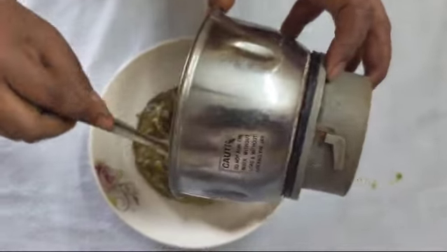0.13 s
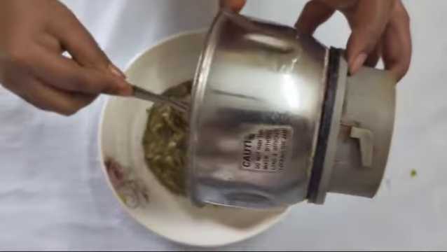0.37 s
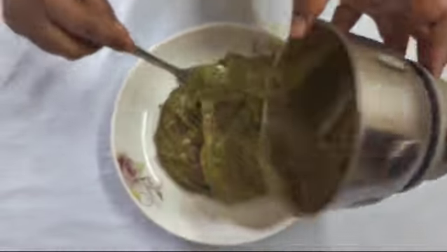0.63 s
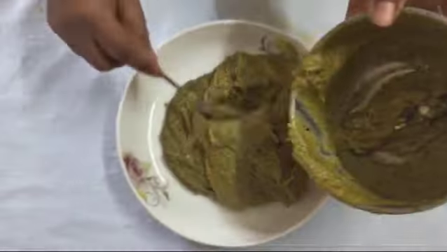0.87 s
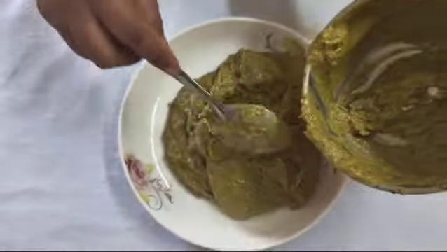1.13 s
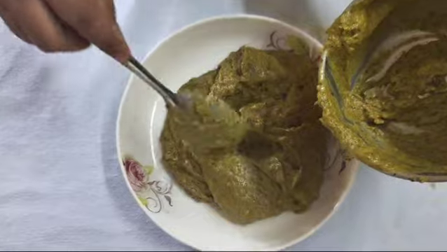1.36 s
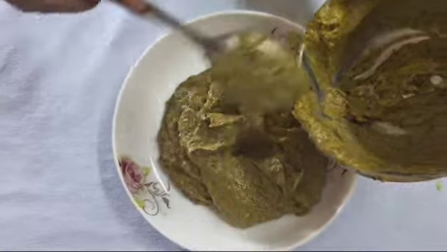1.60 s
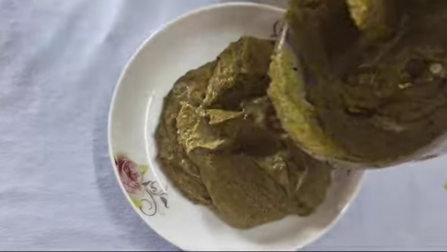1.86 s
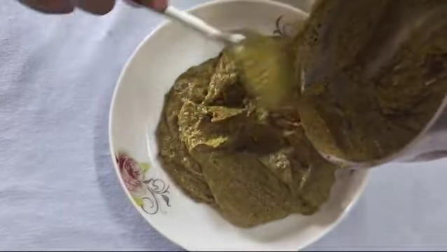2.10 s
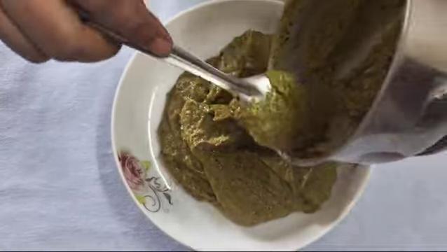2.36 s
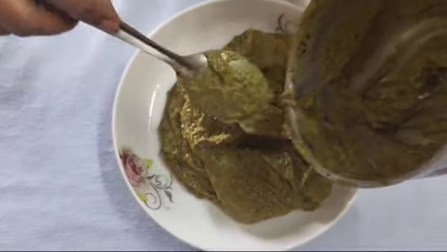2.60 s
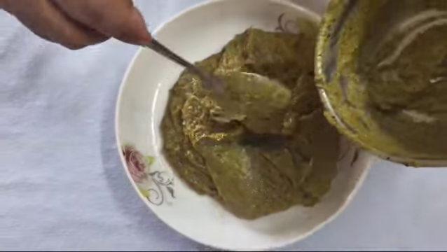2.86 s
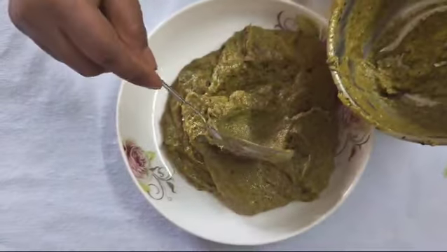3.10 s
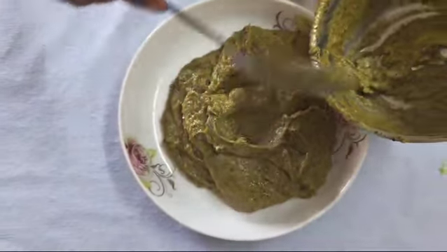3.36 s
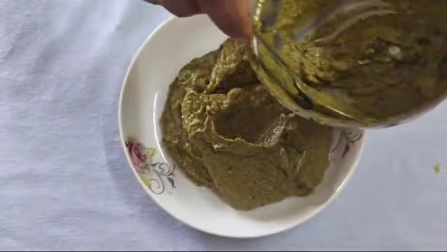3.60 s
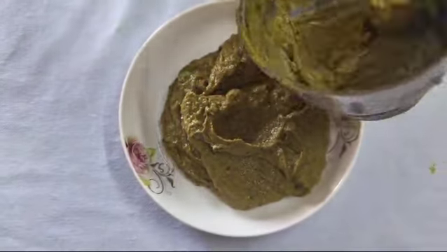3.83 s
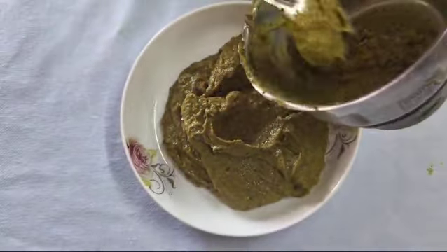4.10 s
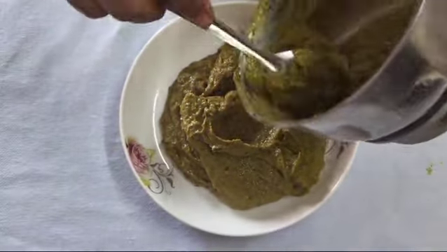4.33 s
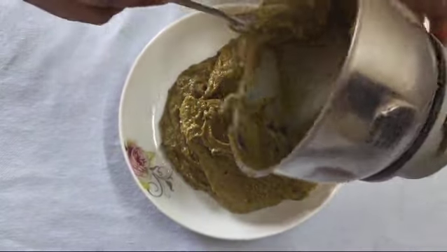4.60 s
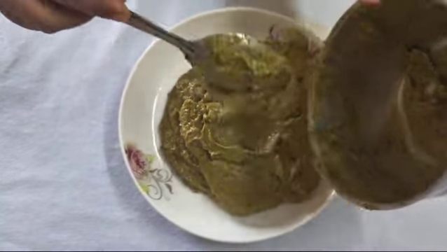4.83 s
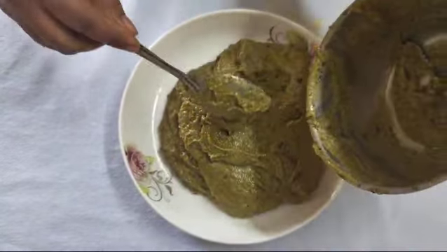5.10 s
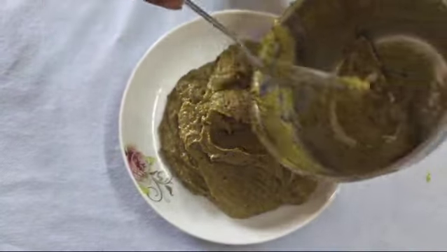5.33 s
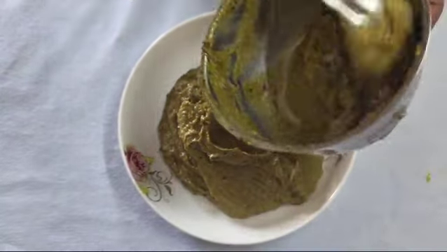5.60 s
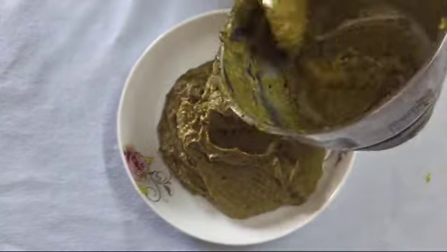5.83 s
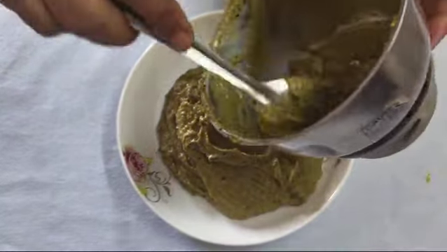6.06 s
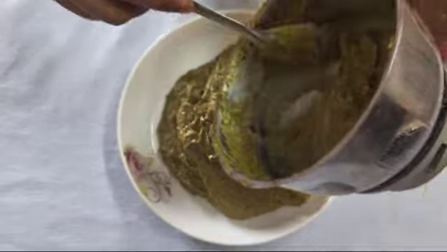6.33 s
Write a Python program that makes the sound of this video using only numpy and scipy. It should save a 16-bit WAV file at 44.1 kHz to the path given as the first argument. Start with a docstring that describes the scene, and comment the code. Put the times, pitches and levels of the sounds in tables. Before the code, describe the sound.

A steel spoon scrapes thick paste from a small metal jar, heard very close in stereo in a quiet kitchen. Rubbing and knocks open it, then only faint taps; a brief scrape and a dense rattle follow midway. A longer, harder run of scraping and clanking comes later, then a pause and a final burst up to the end. Low rumble and faint hiss lie beneath.

```python
"""A steel spoon scrapes thick paste out of a small steel jar, close above two microphones in a quiet kitchen.
It rubs and knocks at once, thins to faint taps, scrapes again near 2 s and rattles densely near 2.6 s;
a long hard run follows from 3.7 to 4.8 s, then faint taps and a last run from 5.6 s to the end.
Strokes are stick-slip noise, knocks short chatter, through resonances of a jar that paste damps to brief rings.
Filtered noise and sines lie under it all: household rumble, deep hand sway, faint hiss, thin appliance whine."""
import sys
import numpy as np
from scipy import signal
from scipy.fft import rfft, irfft, next_fast_len
from scipy.io import wavfile
from scipy.ndimage import uniform_filter1d, map_coordinates

SR = 44100
rng = np.random.default_rng(int(sys.argv[2]) if len(sys.argv) > 2 else 0)


def inscribe(sig):
    """Save sig as 16-bit PCM at rate SR to the path in sys.argv[1].

    A 1-D sig is mono; a 2-D sig holds one channel per row.
    Samples are clipped to [-1, 1] before scaling.
    """
    pcm = np.round(np.clip(np.atleast_2d(sig).T, -1, 1) * 32767)
    wavfile.write(sys.argv[1], SR, pcm.astype(np.int16))


def field_ratio(decibels):
    """Amplitude ratio for a level in dB (20 dB per decade); scalars and array-likes work."""
    return 10 ** (np.asarray(decibels, dtype=float) / 20)


N = 284445
T = np.arange(N) / SR

# Rubbing strokes, a list of rows for each. Each row: time in seconds, pressure in dB,
# belly level relative to it in dB, brightness in dB per octave, wall ring in Hz.
STROKE_ROWS = [
    [(0.0, -43.5, -8, -1, 2500), (0.118, -69, 7.5, 3.5, 2210), (0.16, -80, -13, 0, 2220)],
    [(0.3, -66, -11, 14, 2280), (0.35, -73, -15, 3, 2260), (0.46, -54, 4, 1.5, 2276)],
    [(0.46, -48, -24, 1.5, 2130), (0.51, -63, -9, -6, 2140), (0.572, -58, -9, 5, 1971),
     (0.664, -80, -9, 6, 2000), (0.72, -78, -12, -1, 2085)],
    [(1.98, -83, -9, -14, 2351), (2.075, -55.5, -13, 7, 2215)],
    [(2.075, -74.5, -9, -1, 2250), (2.143, -61.5, -11, 2, 2195), (2.217, -66.5, -10.5, 3.5, 2192),
     (2.26, -102, -14.5, 1, 2010)],
    [(2.52, -76, -11, 0, 2223), (2.564, -70.5, -6.5, 3.5, 2250), (2.586, -70, -8.5, 4, 1980),
     (2.682, -61.5, -13, 1.5, 2351), (2.72, -63.5, -11, 0, 2360)],
    [(3.74, -78, 4.5, -6.5, 2298), (3.792, -62.5, -13, 12, 2670), (3.87, -47, -10.5, 0.5, 2274)],
    [(3.87, -60.5, -16.5, 1.5, 2300), (3.922, -51.5, -10.5, 2.5, 2160), (3.99, -44, -9.5, -3.5, 2060),
     (4.03, -42.5, -10.5, -1, 2090)],
    [(4.03, -47, -9, 4, 1980), (4.102, -53, -10.5, 1, 2020), (4.148, -63.5, -8, -1, 2300),
     (4.18, -64, -9, -1.5, 2237)],
    [(4.36, -65.5, -13.5, 3.5, 2222), (4.41, -65.5, -12.5, 2, 2050), (4.5, -52, -7, 4.5, 2146)],
    [(4.5, -47.5, -10.5, -0.5, 2152), (4.542, -48.5, -9, 2, 2110), (4.63, -46, -7.5, 1.5, 2312)],
    [(4.63, -51.5, -10.5, 4, 2282), (4.66, -57.5, -8.5, -1, 2354), (4.782, -58.5, 0, 10.5, 2280),
     (4.83, -78, -7.5, 2, 2308)],
    [(5.62, -80, -5, 7, 2280), (5.682, -78, 6.5, 4.5, 2230), (5.76, -76.5, 0, 9.5, 2319)],
    [(5.76, -67, -13, 9.5, 2210), (5.91, -57.5, 9, 7.5, 1998)],
    [(5.91, -62, -9, 4, 2030), (5.95, -56, -6, 8.5, 2152), (6.04, -79, -17, 2.5, 2105)],
    [(6.165, -65, -6, 3, 2121), (6.255, -73, -9, 13, 2080), (6.335, -47, 3, 1, 2115)],
    [(6.335, -47, -12, -1.5, 2254), (6.385, -47.5, -15, 3, 2168), (6.45, -45, -9, 3.5, 2347)],
]
# Spoon on wall. Each row: time in seconds, nominal peak in dB, belly level relative to it in dB,
# ring under the spoon in Hz, decay of the contact in ms.
KNOCK_ROWS = [(0.2942, -25, -8, 2130, 2.9), (0.41, -29, -16, 1420, 1.7), (0.4573, -25.5, -10.5, 2270, 2.4),
              (0.5762, -26, -21.5, 2160, 6.6), (0.8064, -54.5, -8, 1620, 2.6),
              (0.8659, -57.5, -19, 2260, 5.2), (0.9552, -59.5, -37, 2260, 5.6),
              (1.0075, -59.5, -27, 2350, 4.3), (1.3324, -66, -31, 2280, 5.1), (1.3784, -63, -27, 2270, 2.5),
              (1.9787, -28.5, -18, 1410, 2.5), (2.0765, -27, -8.5, 2190, 4.8),
              (2.1237, -43.5, -14.5, 1580, 6.9), (2.3216, -61.5, -17.5, 1830, 6),
              (2.5158, -24.5, -16, 4480, 2.8), (2.5432, -29.5, -28.5, 1800, 4.3),
              (2.593, -35.5, -35.5, 1900, 6.8), (2.6064, -33, -29, 3420, 4.9), (2.6395, -18, -30, 3370, 6),
              (2.6534, -24, -30.5, 3320, 6.8), (2.6694, -22, -32.5, 3670, 4.9),
              (2.6793, -24, -30.5, 3670, 4.6), (2.6879, -23, -27.5, 3760, 4.8),
              (2.6958, -21.5, -24, 4570, 7.3), (2.7044, -23, -23.5, 3620, 2.2),
              (3.0945, -59.5, -24, 2810, 3.5), (3.15, -65, -20.5, 2400, 4), (3.711, -37, -41, 5260, 1.6),
              (3.8659, -15.5, -19.5, 2280, 2.7), (3.907, -19.5, -7.5, 1950, 1.87),
              (3.9639, -31, -8, 1910, 4.7), (3.9802, -28, -18, 1850, 1.4), (4.0292, -26, -10, 1980, 3.1),
              (4.05, -22.5, -12.5, 1980, 1.6), (4.0604, -21.5, -18, 1880, 2.2),
              (4.0822, -16, -14, 1980, 3.9), (4.115, -17.5, -10, 3130, 1.74),
              (4.1411, -24.5, -16.5, 3100, 3), (4.354, -15, -19, 2330, 4.6), (4.4152, -16.5, -4, 1970, 2.1),
              (4.5015, -19, -13.5, 1904, 2.4), (4.565, -30, -6, 1250, 6.1), (4.6276, -14.5, -8, 5740, 1.8),
              (5.072, -55.5, -15, 4950, 2.5), (5.62, -53.5, -19, 2296, 3.5),
              (5.7611, -36.5, -13, 5750, 6.8), (5.7914, -25, -20.5, 5550, 3),
              (5.8609, -34.5, -12.5, 2040, 2.9), (5.909, -18, -17.5, 3030, 2.4),
              (5.9464, -29, -33, 1980, 2.5), (5.9712, -23.5, -22.5, 2160, 8.1),
              (5.9834, -29.5, -24, 2070, 1.9), (6.162, -31, -19, 5430, 4.6), (6.2335, -13, -5, 2000, 2),
              (6.2482, -28, -10, 2030, 2.3), (6.34, -17, -13.5, 2120, 4.2), (6.3719, -28.5, -4, 2110, 3.3),
              (6.4008, -26, -14, 4080, 1.6), (6.4062, -25.5, -12.5, 3920, 7.5),
              (6.4222, -22.5, -15, 2170, 3.8), (6.4368, -22, -24, 2840, 6.1)]
# Jar resonances: belly, wall, edge. Each row: centre in Hz, width in Hz, relative level in dB.
BELLY_MODES = [(992, 22, 1.5), (1420, 390, -21)]
WALL_MODES = [(1980, 62, 0), (2280, 30, 3.5), (2650, 130, -7.5), (1690, 184, -9.5)]
EDGE_MODES = [(3070, 110, -11), (3240, 330, -9.5), (4020, 110, -11), (4854, 180, 12), (5740, 820, -14.5),
              (7220, 190, 0.5)]
# The whole jar jolts in the hand. Each row: centre in Hz, width in Hz, relative level in dB.
THUD_MODES = [(268, 180, 6.5), (417, 750, -11.5)]
# Long thin modes of the spoon handle. Each row: centre in Hz, width in Hz, relative level in dB.
SPOON_MODES = [(1960, 12, -8), (2800, 10, -7), (3470, 4, -0.5), (3880, 8, -2), (4650, 14, -7),
               (5800, 14, -6)]
# Broad contact noise. Each row: frequency in Hz, relative level in dB.
GRIT_SPECTRUM = [(2000, -26.5), (3000, 4), (5000, 5.5), (7000, 2.5), (8000, -21.5), (16000, -60.5)]
# Finest contact noise, with the microphone's treble dip and lift. Each row: frequency in Hz, relative level in dB.
TOP_SPECTRUM = [(5000, -43.5), (7000, -7.5), (8000, -11), (8800, -6.5), (10000, -19.5), (12200, 4),
                (13800, -4.5), (14500, -15.5), (16000, -25), (16600, -64.5)]
# The jar moves under the microphones. Each row: time in seconds, left over right in dB.
JAR_PAN = [(0.0, -2.5), (1.85, -5.5), (2.17, -4), (2.46, -12), (2.51, -1), (3.74, -0.5), (3.75, 0),
           (4.58, -6), (5.3, 2), (6.0, -7.5), (6.03, -2.5), (6.45, -6.5)]
# Near sound. Each row: frequency in Hz, left-right correlation (-1 to 1).
NEAR_ALIKE = [(400, 1), (640, 0.86), (1000, 1), (1400, 0.32), (3000, 0.36), (7000, 0.31), (15000, 0.2)]
# Far sound. Each row: frequency in Hz, left-right correlation (-1 to 1).
FAR_ALIKE = [(300, 1), (480, 0.88), (640, 0.42), (1000, 0.0044), (15000, 0.24)]
# Kitchen decay. Each row: frequency in Hz, time to fall 60 dB in seconds.
KITCHEN_T60 = [(500, 0.37), (2000, 0.38), (5000, 0.34), (12000, 0.32)]
# Household rumble. Each row: frequency in Hz, relative density in dB.
RUMBLE_SPECTRUM = [(16, -37), (28, 0.5), (54, 0.5), (70, -16), (81, -6), (130, -6.5), (177, -7.5),
                   (206, -6), (275, -13), (317, -15), (340, -11.5), (357, -20), (480, -38.5), (620, -69),
                   (1060, -120)]
# Deep sway from the moving hand. Each row: time in seconds, level in dB rms.
SWAY_LEVEL = [(0.0, -51), (0.03, -60.5), (1.54, -68), (2.69, -40.5), (3.57, -52.5), (4.2, -41),
              (4.31, -54.5), (4.56, -42), (4.99, -57), (5.06, -54), (5.34, -72), (5.43, -50.5),
              (5.48, -62.5), (6.45, -44)]
# Colour of the hand's sway. Each row: frequency in Hz, relative density in dB.
SWAY_SPECTRUM = [(4, -29), (8, -6), (18, 0.5), (24, -2), (31, -16.5), (40, -30), (60, -120)]
# Faint hiss. Each row: frequency in Hz, relative density in dB.
HISS_SPECTRUM = [(240, -25.5), (400, -2.5), (475, -14.5), (511, -5.5), (550, -10), (866, -8.5),
                 (1160, -15.5), (1740, -17), (2230, -14.5), (2430, -12.5), (2810, -19), (3380, -20.5),
                 (7500, -34), (9750, -77), (16500, -120)]
# Treble fizz. Each row: frequency in Hz, relative density in dB.
FIZZ_SPECTRUM = [(9500, -59), (11000, -1), (12500, -3), (14000, -1), (15000, -60)]
# Appliance tones. Each row: frequency in Hz, relative level in dB.
WHINE_TONES = [(306.8, -72), (328.4, -72.5), (511.4, -86), (2342, -103), (2390, -84.5), (3413, -102),
               (3849, -102)]
# Treble cut of the whole mix. Each row: frequency in Hz, gain in dB.
TREBLE_CUT = [(13900, 0.5), (14600, -6.5), (16000, -7.5), (16600, -40.5)]

# strokes: levels over the pressure; octaves from the wall's range, to scale the brightness
RUB_BELLY_DB, RUB_WALL_DB, RUB_EDGE_DB, RUB_TOP_DB = -1, 0, -0.5, -13
SLIDE_BELLY_DB, SLIDE_WALL_DB, SLIDE_EDGE_DB = -0.5, 4, -7.5
EDGE_OCT, TOP_OCT = 0.95, 2.4
EDGE_RING_HZ, EDGE_WANDER_SHARE = 3900, 0.1
BELLY_WANDER_SHARE = 0.045  # pitch drifts as paste and jar move
CATCHES_PER_S, CATCH_DB, CATCH_DECAY_S = 140, 3.5, 0.002  # the edge snags on the wall

# knocks: levels over the nominal peak
HIT_BELLY_DB, HIT_WALL_DB, HIT_EDGE_DB, HIT_RING_DB, HIT_TOP_DB, HIT_THUD_DB = 0.5, -9.5, -4, -12.5, -23.5, -22
WALL_HZ, EDGE_HZ = 2200, 4300  # centres of the two ranges
FALL_DB_PER_OCT = 7.5  # a range weakens as the ring under the spoon lies farther from it
BLOW_S, BLOW_DB_PER_DB = 0.005, 0.9  # size at a -27 dB peak; growth with the peak
SKID_SHARE, SKID_RISE_S = 0.056, 0.0059  # a spoon already rubbing skids into the knock
WIDTH_FACTOR, RETUNE_SHARE = 4.07, 0.04  # a knock widens the modes and shifts them at random
DULL_DB_PER_DB = 0.34  # edge and top lose this for each dB of belly over -15.5

RUMBLE_DB, HISS_DB, FIZZ_DB = -54.5, -73, -99  # about which the levels wander


def unit(x):
    """Scaled to rms 1."""
    return x / np.sqrt(np.mean(x ** 2) + 1e-20)


def along(points, hz):
    """(Hz, value) points, interpolated on a log frequency axis."""
    f, v = np.transpose(points)
    return np.interp(np.log(hz + 1), np.log(f + 1), v)


def over_time(points):
    """(s, value) points, interpolated over the scene."""
    return np.interp(T, *np.transpose(points))


def wobble(knots_per_s):
    """Smooth random curve through normal draws."""
    knots = rng.standard_normal(int(N * knots_per_s / SR) + 4)
    return map_coordinates(knots, [T * knots_per_s])


def filtered(x, response):
    """x times a complex response of frequency."""
    m = next_fast_len(x.shape[-1] + 8192)
    return irfft(rfft(x, m) * response(np.fft.rfftfreq(m, 1 / SR)), m)[..., :x.shape[-1]]


def coloured(spectrum, channels):
    """Noise of rms 1, shaped by a spectrum in dB."""
    return unit(filtered(rng.standard_normal((channels, N)), lambda hz: field_ratio(along(spectrum, hz))))


def pair(two, alike):
    """Mixes two unrelated signals into left and right of the given correlation."""
    def weights(hz):
        turn = np.arccos(np.clip(along(alike, hz), -1, 1)) / 2
        return np.array([np.cos(turn), 1j * np.sin(turn)])
    mid, side = filtered(two, weights)
    return np.array([mid + side, mid - side])


def panned(x, pan_db):
    """Left-right level difference, half on each side."""
    return x * field_ratio(np.array([pan_db, -pan_db]) / 2)


def ringing(modes, hz):
    """Summed causal responses of damped resonances, signs alternating."""
    total = 0
    for k, (centre, width, db) in enumerate(modes):
        band = 1j * hz * width
        total = total + (-1) ** k * field_ratio(db) * band / (centre * centre - hz * hz + band)
    return total


def belly_ringing(modes, hz):
    """Belly resonances, thinned below 600 Hz."""
    return ringing(modes, hz) * 1j * hz / (600 + 1j * hz)


def edge_ringing(modes, hz, grit_db):
    """Spoon edge: short high resonances over broad contact noise."""
    return ringing(modes, hz) + field_ratio(grit_db + along(GRIT_SPECTRUM, hz))


def top_response(hz):
    """Finest contact noise."""
    return field_ratio(along(TOP_SPECTRUM, hz))


def stick_slip():
    """Grip of the spoon on the wall: random decaying snags, coming and going while it touches."""
    touches = np.any([(T >= rows[0][0]) & (T <= rows[-1][0]) for rows in STROKE_ROWS], axis=0)
    touching = uniform_filter1d(1.0 * touches, size=200)
    sizes = field_ratio(CATCH_DB * np.minimum(rng.exponential(size=N), 2.5))
    catches = (rng.random(N) < CATCHES_PER_S / SR) * sizes
    snags = signal.lfilter([1], [1, -np.exp(-1 / (CATCH_DECAY_S * SR))], catches)
    return touching * unit(1 + snags) * field_ratio(1.8 * wobble(40) + 0.9 * wobble(250))


def strokes():
    """Stick-slip grit drives the jar's resonances; wall and edge rings slide, and the belly's pitch drifts."""
    rows = np.vstack(STROKE_ROWS)
    times = np.maximum.accumulate(rows[:, 0])
    pressure_db, belly_db, tilt_db, wall_hz = (np.interp(T, times, column) for column in rows.T[1:])
    belly_db = pressure_db + belly_db
    edge_db = pressure_db + EDGE_OCT * tilt_db
    top_db = pressure_db + TOP_OCT * tilt_db
    slips = stick_slip()

    def drive():
        return field_ratio(3.7 * wobble(30)) * rng.standard_normal((2, N))

    def rubbed(db, response):
        noise = drive()
        level = np.std(filtered(noise, response))
        return pair(filtered(noise * slips * field_ratio(db), response) / level, NEAR_ALIKE)

    def slide(db, hz, half_width_hz):
        slow = unit(filtered(drive(), lambda f: 1 / (1 + 1j * f / half_width_hz)))
        tone = np.sin(2 * np.pi * np.cumsum(hz) / SR)
        return slips * field_ratio(db) * pair(slow * tone, NEAR_ALIKE)

    belly = rubbed(belly_db + RUB_BELLY_DB, lambda f: belly_ringing(BELLY_MODES, f))
    wall = rubbed(pressure_db + RUB_WALL_DB, lambda f: ringing(WALL_MODES, f))
    edge = rubbed(edge_db + RUB_EDGE_DB, lambda f: edge_ringing(EDGE_MODES, f, grit_db=2.5))
    top = rubbed(top_db + RUB_TOP_DB, top_response)
    belly_hz = BELLY_MODES[0][0] * (1 + BELLY_WANDER_SHARE * wobble(8))
    edge_hz = EDGE_RING_HZ * (1 + EDGE_WANDER_SHARE * wobble(12))
    belly = belly + slide(belly_db + SLIDE_BELLY_DB, belly_hz, half_width_hz=30)
    wall = wall + slide(pressure_db + SLIDE_WALL_DB, wall_hz, half_width_hz=28)
    edge = edge + slide(edge_db + SLIDE_EDGE_DB, edge_hz, half_width_hz=90)
    return belly + panned(wall + edge + top, over_time(JAR_PAN))


def knock_noise(t, lead, s, peak_db, decay_s):
    """Noise of one knock: brief soft onset, blow and decaying chatter; a short contact is mostly one hard blow."""
    rubbing = any(rows[0][0] < s - SKID_RISE_S <= rows[-1][0] for rows in STROKE_ROWS)
    onset = 0.23 * np.exp(t / 0.0011)
    skid = rubbing * SKID_SHARE * np.exp(t / SKID_RISE_S)
    noise = rng.standard_normal((2, len(t))) * np.where(t < 0, onset + skid, np.exp(-np.abs(t) / decay_s))
    blow = BLOW_S * field_ratio(BLOW_DB_PER_DB * (peak_db + 27)) / decay_s
    noise[:, lead + 55] += blow * np.array([1, rng.choice([-1, 1])])
    return noise


def knocks():
    """Each contact rings belly, wall and edge at new strengths and jolts the jar."""
    out, lead = np.zeros((2, N + SR)), 1300
    t = (np.arange(4096) - lead) / SR
    for s, peak_db, belly_db, ring_hz, decay_ms in KNOCK_ROWS:
        retune = 1 + RETUNE_SHARE * rng.standard_normal()

        def vary(modes):
            return [(c * retune, WIDTH_FACTOR * w, db + 3 * rng.standard_normal()) for c, w, db in modes]

        def near_db(hz):
            return -FALL_DB_PER_OCT * abs(np.log2(ring_hz / hz))

        belly, wall, edge = vary(BELLY_MODES), vary(WALL_MODES), vary(EDGE_MODES)
        pan_db = np.interp(s, *np.transpose(JAR_PAN)) + 2 * rng.standard_normal()
        dull_db = -DULL_DB_PER_DB * max(belly_db + 15.5, 0)
        noise = knock_noise(t, lead, s, peak_db, decay_ms / 1000)
        # each: response, level in dB over the peak, pan in dB
        parts = [(lambda f: belly_ringing(belly, f), belly_db + HIT_BELLY_DB, 0),
                 (lambda f: ringing(THUD_MODES, f), belly_db / 2 + HIT_THUD_DB, 0),
                 (lambda f: ringing(wall, f), HIT_WALL_DB + near_db(WALL_HZ), pan_db),
                 (lambda f: edge_ringing(edge, f, grit_db=3.5), HIT_EDGE_DB + near_db(EDGE_HZ) + dull_db, pan_db),
                 (lambda f: ringing([(ring_hz, 0.055 * ring_hz, 0)], f), HIT_RING_DB, pan_db),
                 (top_response, HIT_TOP_DB + dull_db, pan_db)]
        for response, level_db, side_db in parts:
            ring = pair(filtered(noise, response), NEAR_ALIKE)
            loudest = np.sqrt(uniform_filter1d(np.mean(ring ** 2, axis=0), size=88).max())  # rms over 2 ms
            placed = out[:, round(s * SR) - lead:][:, :len(t)]
            placed += field_ratio(peak_db + level_db) * panned(ring.T / loudest, side_db).T
    return out[:, :N]


def spoon_handle(jar):
    """The contact sound excites the handle's narrow modes."""
    padded = np.pad(jar, [(0, 0), (0, SR)])
    return filtered(padded, lambda hz: ringing(SPOON_MODES, hz))[:, :N]


def kitchen(x):
    """Room tail of noise, each frequency dying at its own speed; a fresh tail for every quarter second."""
    out, step = np.zeros((2, N + 2 * SR)), SR // 4
    for start in range(0, N, step):
        hz, t, z = signal.stft(rng.standard_normal((2, SR // 2)), SR, nperseg=256)
        decay = field_ratio(-60 * t / along(KITCHEN_T60, hz)[:, None])
        tail = signal.istft(z * decay, SR, nperseg=256)[1]
        wet = signal.fftconvolve(x[:, start:start + step], tail / np.linalg.norm(tail[0]), axes=1)
        out[:, start + 200:][:, :wet.shape[1]] += wet  # 4.5 ms late
    return pair(out[:, :N], FAR_ALIKE)


def hand_sway():
    """Mono deep noise, swelling and fading as the hand moves."""
    return field_ratio(over_time(SWAY_LEVEL)) * coloured(SWAY_SPECTRUM, channels=1)


def rumble():
    """Mono low household noise, slowly wandering in level."""
    return field_ratio(RUMBLE_DB + 0.33 * wobble(2.7)) * coloured(RUMBLE_SPECTRUM, channels=1)


def hiss():
    """Wide faint noise, and a fainter treble fizz unrelated between the sides."""
    wide = pair(coloured(HISS_SPECTRUM, channels=2), FAR_ALIKE)
    fizz = field_ratio(FIZZ_DB + 2.8 * wobble(2.9)) * coloured(FIZZ_SPECTRUM, channels=2)
    return field_ratio(HISS_DB + 1.8 * wobble(0.26)) * wide + fizz


def whine():
    """Appliance tones: sines slightly unsteady in level and phase."""
    total = np.zeros(N)
    for hz, db in WHINE_TONES:
        level = field_ratio(db + 2.5 + 1.3 * wobble(4))
        total += level * np.sin(2 * np.pi * hz * T + 0.28 * wobble(4))
    return total


def scene():
    """Jar and spoon, direct and in the room, over the background."""
    jar = strokes() + knocks()
    jar = jar + spoon_handle(jar)
    return jar + field_ratio(-8.5) * kitchen(jar) + hand_sway() + rumble() + hiss() + whine()


def band_limit(x):
    """A steep low-pass at the top of the band."""
    return signal.sosfilt(signal.butter(12, 16520, fs=SR, output="sos"), x)


def record(dry):
    """The top of the scene is cut to finish the mix."""
    mix = filtered(dry, lambda hz: field_ratio(along(TREBLE_CUT, hz)))
    return band_limit(mix)


dry = scene()
out = record(dry)
inscribe(out)
```